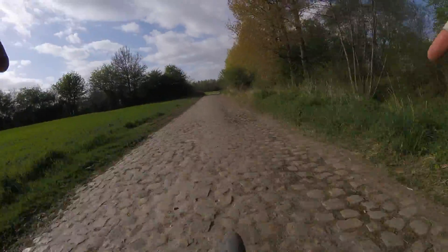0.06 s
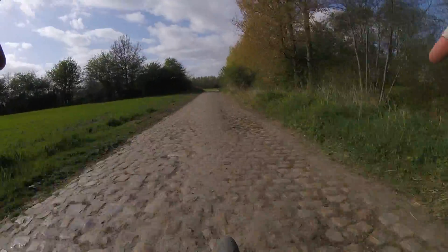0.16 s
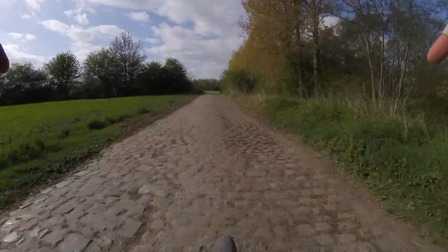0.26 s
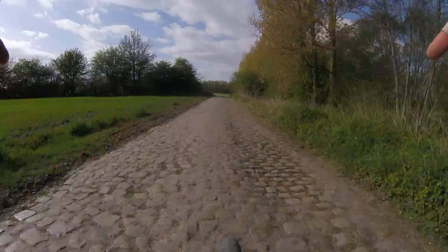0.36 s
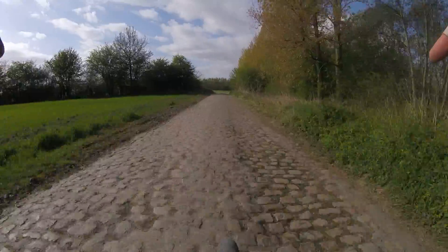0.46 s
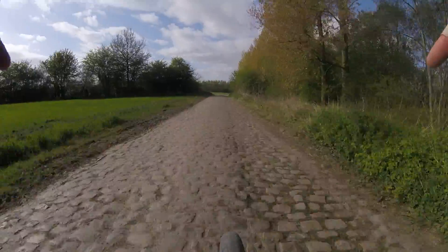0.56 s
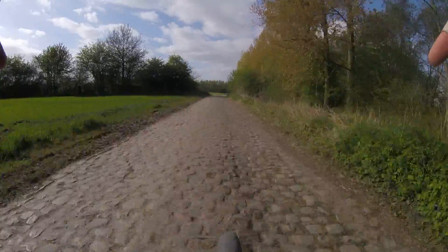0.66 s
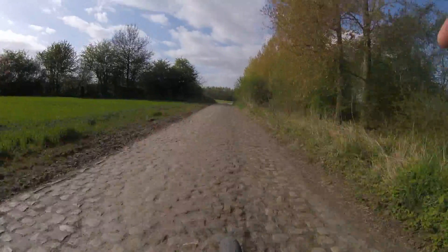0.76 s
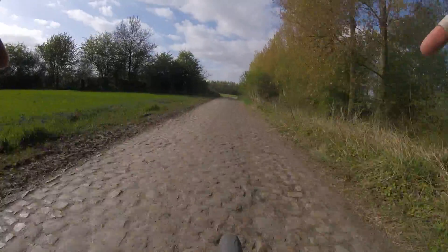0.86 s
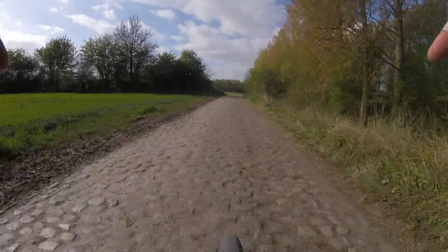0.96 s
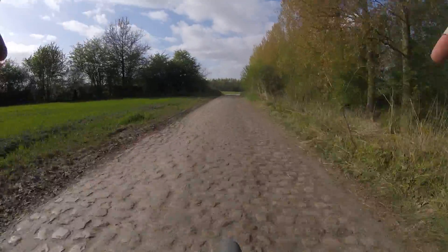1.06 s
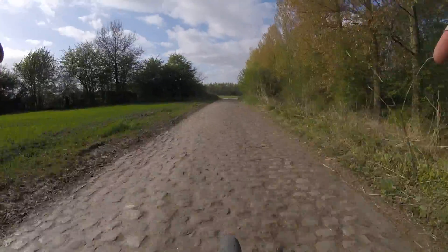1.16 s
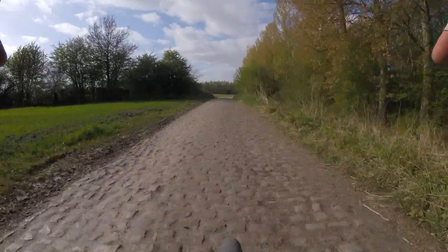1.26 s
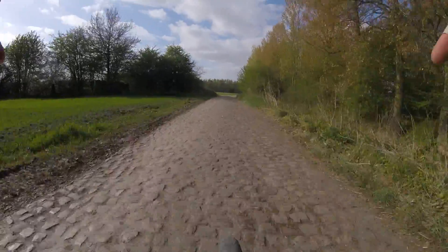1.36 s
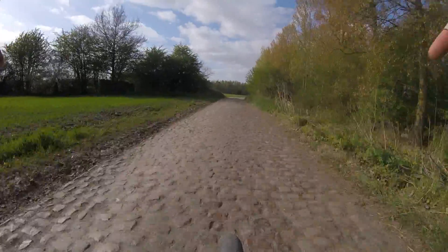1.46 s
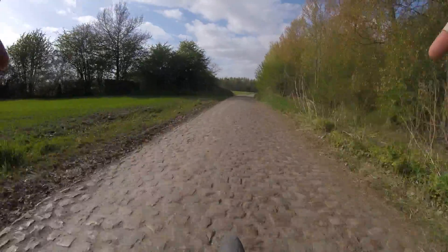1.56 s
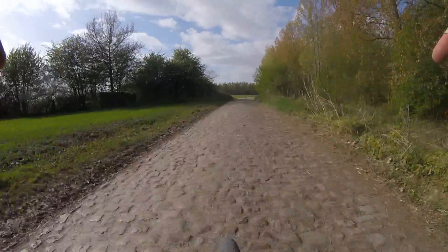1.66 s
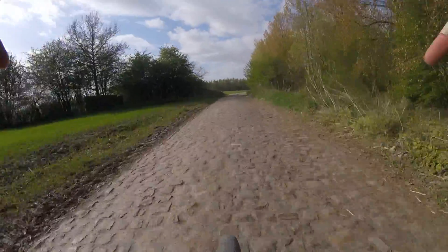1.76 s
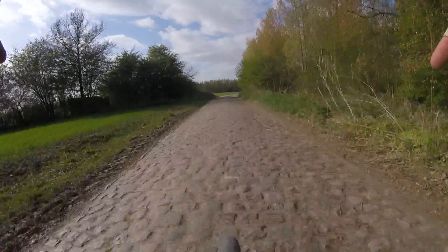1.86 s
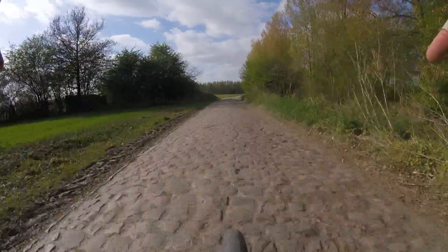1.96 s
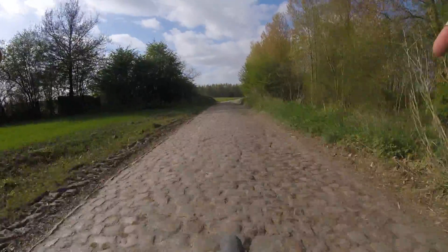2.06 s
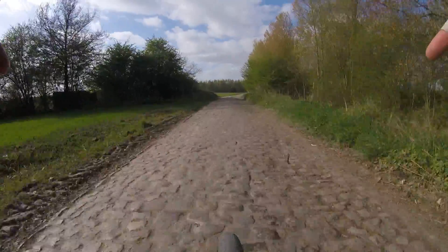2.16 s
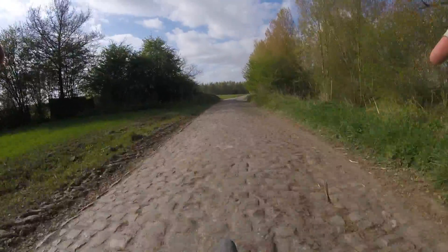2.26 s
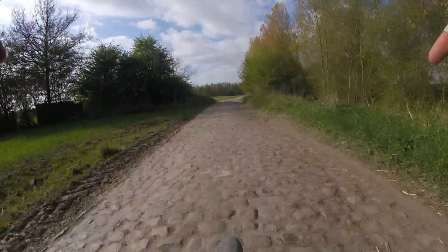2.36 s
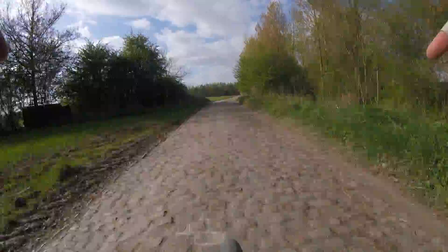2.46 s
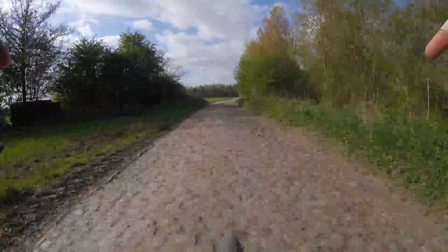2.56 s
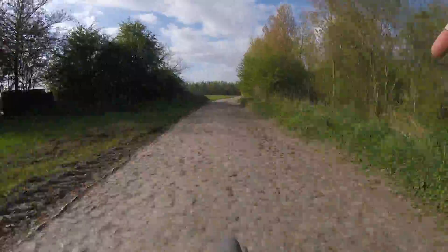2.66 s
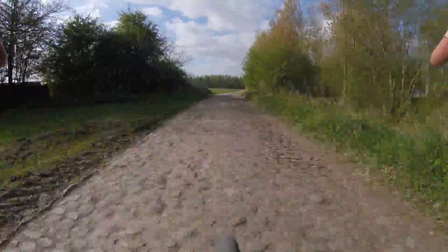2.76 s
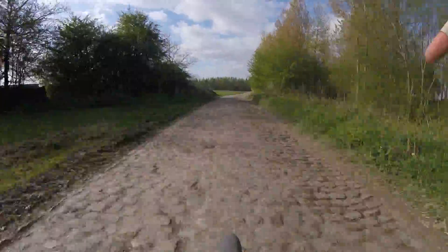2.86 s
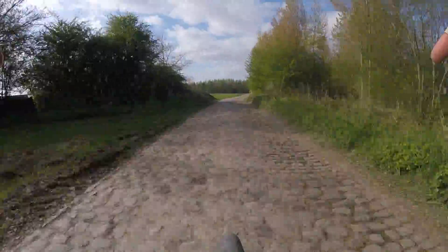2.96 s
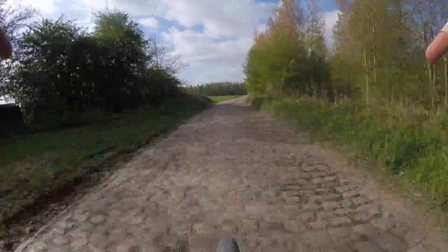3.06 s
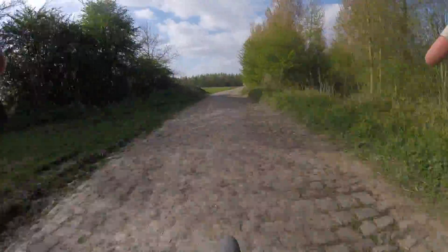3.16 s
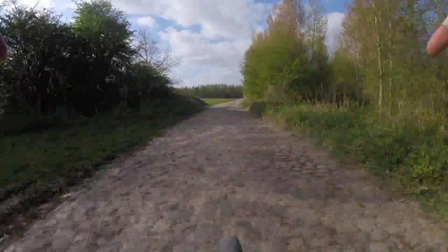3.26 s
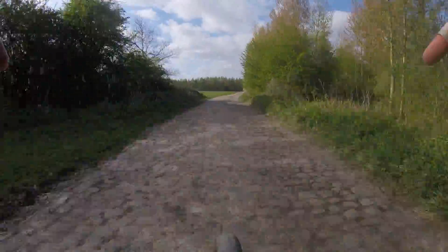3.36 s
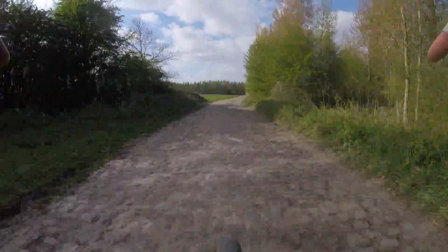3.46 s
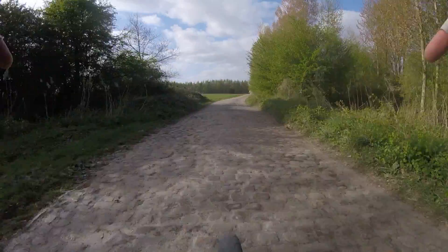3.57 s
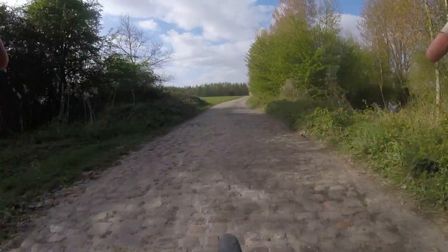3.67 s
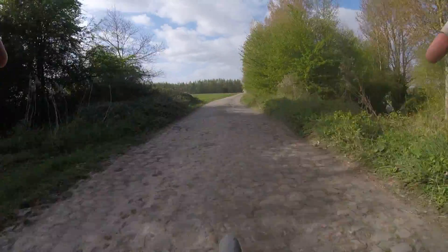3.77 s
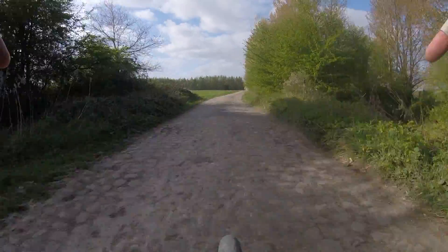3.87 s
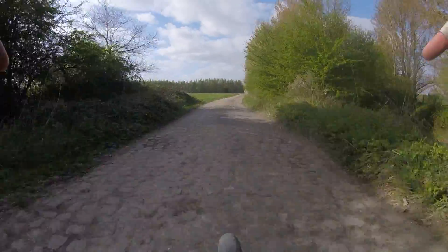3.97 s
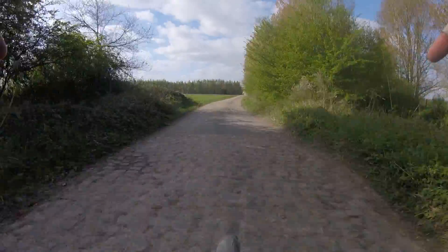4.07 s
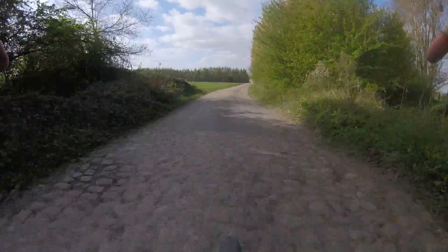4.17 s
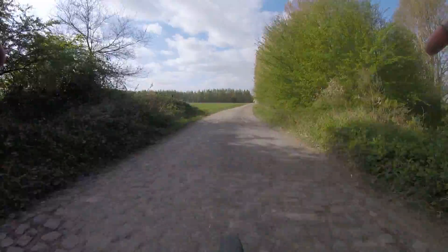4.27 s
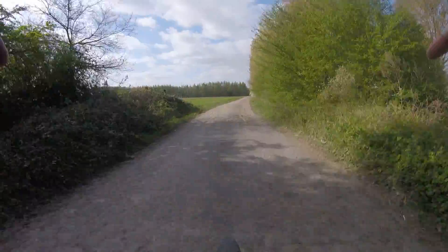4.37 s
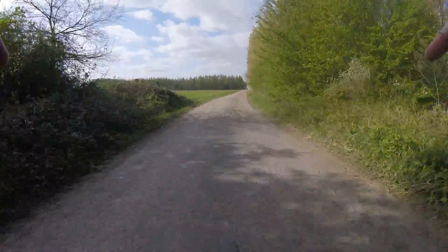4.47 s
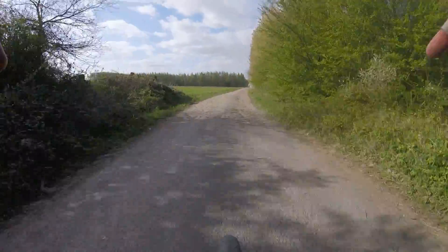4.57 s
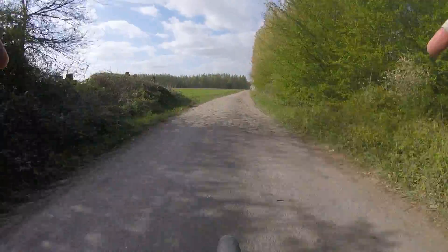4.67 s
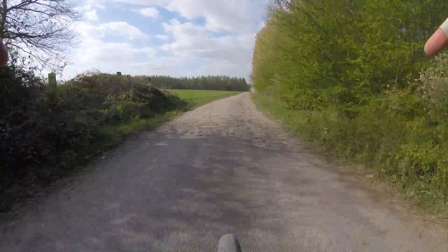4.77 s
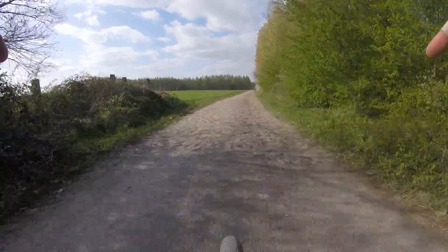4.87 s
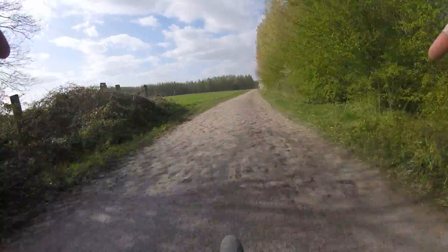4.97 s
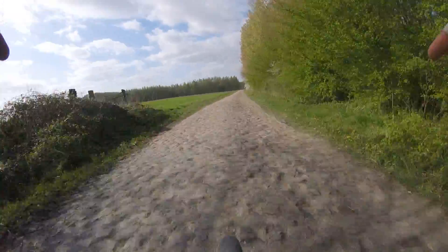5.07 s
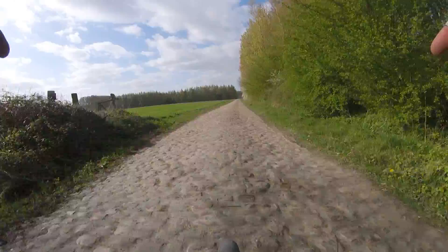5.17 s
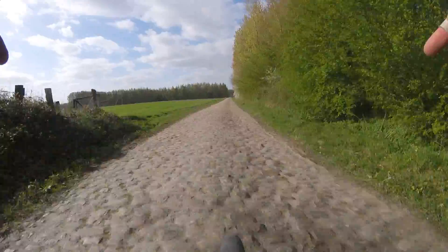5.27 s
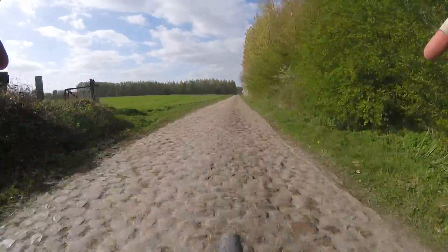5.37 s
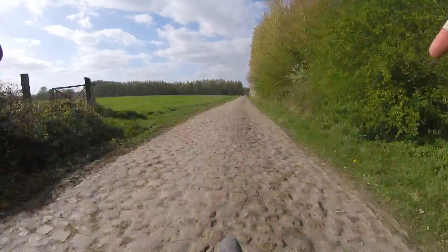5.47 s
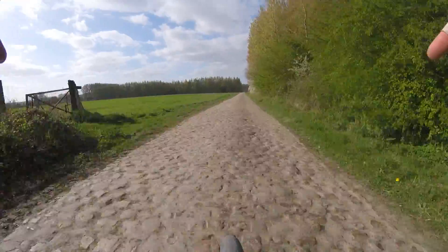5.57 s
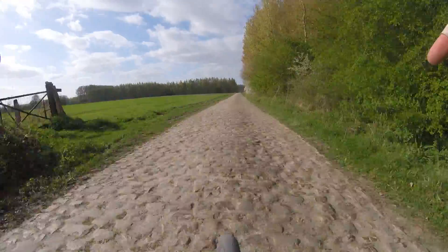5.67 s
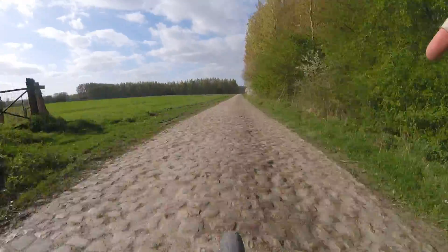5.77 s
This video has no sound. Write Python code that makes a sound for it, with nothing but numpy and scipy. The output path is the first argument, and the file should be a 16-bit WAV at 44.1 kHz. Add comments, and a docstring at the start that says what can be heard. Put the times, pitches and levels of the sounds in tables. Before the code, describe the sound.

A bicycle rides fast over rough cobblestones on a country track, the microphone in a small case clamped to the handlebar. Deep bar thuds swell and fade beneath a drumming frame, irregular mount knocks and bright, clicking rattles. Near the end the hard blows pause for about half a second, leaving gritty tyre hiss, then the heaviest knock lands and the clatter resumes to the end.

```python
"""A bicycle rides over cobblestones; the microphone is in a small case clamped to the handlebar, right at the source.
From the start the bar thuds deep, two bending modes swell and fade, and the frame drums, all as shaped noise.
Short pushes knock on the ringing mount and brief swells of contacts rattle brightly on the case.
After 4.7 s the hard blows stop for about half a second while the thudding sinks and gritty tyre hiss swells;
then rattles return, and the strongest knock lands at 5.3 s, with more knocks and rattles up to the end."""
import sys
import numpy as np
from scipy import signal
from scipy.fft import next_fast_len
from scipy.io import wavfile

SR = 44100
rng = np.random.default_rng(int(sys.argv[2]) if len(sys.argv) > 2 else 0)


def transcribe(signal):
    """Save signal, clipped to [-1, 1], as a 16-bit WAV file at the path in sys.argv[1]."""
    frames = np.atleast_2d(signal).T
    limited = np.clip(frames, -1, 1)
    pcm = np.round(limited * 32767).astype(np.int16)
    wavfile.write(sys.argv[1], SR, pcm)


N = 256220

# hard rattles on the case: time of greatest height [t/s], peak of the case ring [level/dB]
HARD_RATTLES = [(0.146, -42), (0.2029, -40), (0.2266, -34), (0.257, -50), (0.279, -49), (0.299, -36),
                (0.346, -41), (0.3625, -37), (0.369, -37), (0.5887, -36), (0.613, -31.5), (0.624, -34),
                (0.655, -33), (0.665, -31), (0.709, -31.5), (0.777, -36), (0.781, -34), (0.905, -38),
                (0.932, -26.5), (0.944, -34), (1.051, -36), (1.178, -36), (1.194, -37), (1.236, -42),
                (1.255, -33), (1.266, -29), (1.277, -41), (1.309, -31.5), (1.463, -42.5), (1.5466, -37),
                (1.586, -31.5), (1.704, -45), (1.914, -38), (1.921, -36), (2.091, -34), (2.147, -37),
                (2.2, -35.5), (2.223, -40), (2.247, -35), (2.3177, -40), (2.362, -45), (2.504, -33),
                (2.547, -41.5), (2.5664, -38), (2.5916, -28), (2.602, -35), (2.6334, -34), (2.648, -29),
                (2.699, -29.5), (2.742, -42), (2.778, -40), (2.7956, -37), (2.826, -38), (2.8674, -31),
                (2.962, -41.5), (3.056, -31.5), (3.089, -41), (3.103, -27), (3.148, -29), (3.203, -42),
                (3.2181, -41), (3.4708, -40), (3.536, -41), (3.596, -34.5), (3.621, -38), (3.628, -30),
                (3.642, -43), (3.798, -33), (4.009, -44), (4.035, -39.5), (4.1261, -36.5), (4.1535, -41),
                (4.1875, -38.5), (4.354, -46), (4.3814, -28), (4.397, -29), (4.606, -52), (4.614, -42),
                (4.6223, -32.5), (5.237, -48.5), (5.256, -44), (5.292, -40), (5.3778, -35.5), (5.397, -39),
                (5.415, -34.5), (5.488, -37), (5.508, -42), (5.5216, -29.5), (5.533, -33), (5.5756, -35.5),
                (5.672, -44), (5.713, -33)]


def bar(thud_db, lower_db, upper_db):
    """Deep thudding from the tyre as low noise, and the two bending modes of bar and mount as ringing noise."""
    # bending modes, lower then upper: centre [f/Hz], width of one resonance pass [width/Hz]
    bending_modes = [(71.5, 3.0), (98, 3.5)]
    # one second of lead-in lets the filters settle
    thud_noise, *mode_noises = rng.standard_normal((3, N + SR))
    low_noise = band(thud_noise, (21.7, 66.7), order=3)[SR:]
    thudding = from_db(thud_db) * evened(low_noise, share=0.96)
    bending = np.zeros(N)
    for noise, (hz, width_hz), db in zip(mode_noises, bending_modes, (lower_db, upper_db)):
        mode = resonate(resonate(noise, hz, width_hz), hz, width_hz)[SR:]
        bending += from_db(db) * evened(mode, share=0.93)
    return thudding, bending


def frame(drum_db, mount_db, edges):
    """The frame drums evenly; stone edges jolt the mount, whose soft contacts carry little treble."""
    # frame resonances: centre [f/Hz], width [width/Hz], relative level [level/dB]
    frame_modes = [(106.9, 19.9, -7), (158.6, 47.6, -5.5), (206.3, 25.8, 1.5), (232.05, 25.35, -2),
                   (262.6, 25.1, -8.5)]
    # mount resonances: centre [f/Hz], width [width/Hz], relative level [level/dB]
    mount_modes = [(324, 42, -6), (479.2, 49.7, -1), (616, 70.6, -6.5), (816, 133, -16), (1100, 232, -21),
                   (1360, 590, -29.5)]
    # hard knocks: time of greatest height [t/s], peak of the mount ring before the low-pass [level/dB]
    hard_knocks = [(0.179, -23.5), (0.2029, -17), (0.2366, -17.5), (0.4139, -21.5), (0.4378, -18.5),
                   (0.6038, -20.5), (0.627, -19), (0.7095, -14.5), (0.7762, -22.5), (0.892, -27),
                   (0.933, -19), (0.9434, -18), (1.0619, -20), (1.1385, -19), (1.3095, -20), (1.329, -16.5),
                   (1.461, -14), (1.484, -20.5), (1.524, -26), (1.5921, -20), (1.6243, -17),
                   (1.6523, -21.5), (1.75, -20.5), (1.776, -19.5), (1.9714, -18), (2.1225, -18),
                   (2.3724, -22), (2.47, -19.5), (2.6329, -21), (2.7236, -25), (2.8457, -19),
                   (2.861, -15.5), (3.0959, -19), (3.1478, -16), (3.2974, -20), (3.3128, -18.5),
                   (3.503, -21.5), (3.596, -16), (3.8139, -18.5), (4.1468, -17), (4.1778, -22.5),
                   (4.3814, -23), (4.397, -17.5), (4.4383, -16.5), (4.6154, -15), (4.6235, -20),
                   (4.629, -19.5), (5.3204, -12.5), (5.4049, -16.5), (5.4151, -13), (5.5221, -22.5),
                   (5.6172, -19.5), (5.669, -22.5)]

    drum_noise = rng.standard_normal(N) * (from_db(10.0) + edges)
    drumming = rms_one(body(drum_noise, frame_modes))
    # runs of worse stones make the knocking come in lumps
    lumps = bursts(per_s=13, spread_db=1.5, length_s=0.085)
    jolts = rng.standard_normal(N) * (from_db(4.5) + edges) * (from_db(11.0) + lumps)
    knocking = rms_one(body(jolts, mount_modes))

    # a knock is one short push of 0.5 ms, either way
    pushes = rng.choice([-1, 1], (len(hard_knocks), 1)) * np.hanning(int(0.00051 * SR))
    mount_knocks = struck(hard_knocks, pushes, mount_modes, spread_db=0.0)
    # each knock also rings the frame, 2.5 dB under the mount
    frame_knocks = from_db(-2.5) * struck(hard_knocks, pushes, frame_modes, spread_db=1.0)
    shaken = from_db(drum_db) * drumming + from_db(mount_db) * knocking + mount_knocks + frame_knocks
    return low_pass(shaken, 2200.0, order=2)


def rattle(chatter_db, edges, beat):
    """Loose parts tick against the case in clusters; a hard rattle is a brief swell of tiny contacts."""
    # resonances of the microphone's case: centre [f/Hz], width [width/Hz], relative level [level/dB]
    case_modes = [(1820, 900, -9), (2620, 760, -10), (3350, 980, -7), (4515, 530, 0), (5340, 800, -1.5),
                  (6540, 210, 1.5), (7200, 1100, -10)]
    # dull resonances of the clamp: centre [f/Hz], width [width/Hz], relative level [level/dB]
    clamp_modes = [(1440, 800, -0.5), (2920, 1400, -1)]

    ticks = beat * bursts(per_s=300, spread_db=3.0, length_s=0.003) + from_db(-6.0) * edges
    ticking = rng.standard_normal(N) * (from_db(-6.5) + ticks)
    chatter = from_db(chatter_db) * rms_one(body(ticking, case_modes))
    faint_hiss = from_db(-74.5) * rms_one(body(rng.standard_normal(N), case_modes))

    swell = np.hanning(int(0.0042 * SR)) ** 2
    contacts = rng.standard_normal((len(HARD_RATTLES), len(swell))) * swell
    # heavier parts land softer, so the top of their ring is duller
    contacts = low_pass(contacts, 6700, order=2)
    hard = struck(HARD_RATTLES, contacts, case_modes, spread_db=3.0)
    # the clamp clacks 13 dB under every hard rattle
    clacks = from_db(-13) * struck(HARD_RATTLES, contacts, clamp_modes, spread_db=3.0)
    return chatter + faint_hiss + clacks + hard


def tyre(hiss_db, edges):
    """Gritty hiss of rubber on stone: band-limited noise roughened by the stone edges."""
    grit = rng.standard_normal(N) * (from_db(3.5) + edges)
    return from_db(hiss_db) * rms_one(band(grit, (870, 3230), order=4))


def struck(blows, forces, modes, spread_db):
    """Forces strike modes with strengths spread at random; each ring peaks at its given time and level."""
    out = np.zeros(N)
    strengths_db = rng.normal(0, spread_db, (len(blows), len(modes)))
    for (s, db), force, strength_db in zip(blows, forces, strengths_db):
        # only the level column of the modes is changed
        varied_modes = np.array(modes) + np.outer(strength_db, [0, 0, 1])
        ring = body(np.pad(force, (0, SR // 15)), varied_modes)
        height = np.abs(ring).max()
        at = round(s * SR) - np.abs(ring).argmax()
        out[at:at + len(ring)] += (from_db(db) * ring / height)[:N - at]
    return out


def bursts(per_s, spread_db, length_s):
    """Envelope of random jolts: uneven sizes, each a smooth hump; rms 1."""
    present = rng.random(N) < per_s / SR
    sizes = from_db(spread_db * np.minimum(rng.exponential(1, N), 3.5)) * present
    hump = np.hanning(int(length_s * SR))
    return rms_one(signal.fftconvolve(sizes, hump, "same").clip(0))


def body(x, modes):
    """Parallel resonances with alternating signs."""
    out = 0
    for k, (hz, width_hz, db) in enumerate(modes):
        out = out + (-1) ** k * from_db(db) * resonate(x, hz, width_hz)
    return out


def resonate(x, hz, width_hz):
    """Two-pole resonance with a peak gain of about 1."""
    r = np.exp(-np.pi * width_hz / SR)
    numerator = np.array([1, 0, -1]) * (1 - r * r) / 2
    denominator = [1, -2 * r * np.cos(2 * np.pi * hz / SR), r * r]
    return signal.lfilter(numerator, denominator, x)


def evened(x, share):
    """Divides out a share of the signal's own swell, as in a mode driven steadily; rms 1."""
    swell = np.abs(signal.hilbert(rms_one(x), next_fast_len(N))[:N])
    return rms_one(x / (swell + 0.017) ** share)


def band(x, edges_hz, order):
    """Butterworth band-pass."""
    return signal.sosfilt(signal.butter(order, edges_hz, "band", fs=SR, output="sos"), x)


def low_pass(x, cut_hz, order):
    """Butterworth low-pass."""
    return signal.sosfilt(signal.butter(order, cut_hz, fs=SR, output="sos"), x)


def from_db(db):
    """Gain of a level in dB."""
    return 10 ** (np.asarray(db) / 20)


def rms_one(x):
    """Scaled to rms 1."""
    return x / np.sqrt(np.mean(x ** 2) + 1e-20)


def in_time(rows):
    """Columns of a curve table, interpolated to one value per sample."""
    s, *columns = np.transpose(rows)
    return [np.interp(np.arange(N) / SR, s, column) for column in columns]


def with_swells(base_db, swells):
    """Level in dB of a base with smooth swells (s at height, dB, length s) added in power."""
    t = np.arange(N) / SR
    power = from_db(base_db) ** 2
    for s, db, length_s in swells:
        start, end = np.searchsorted(t, [s - length_s / 2, s + length_s / 2])
        hump = np.cos(np.pi * (t[start:end] - s) / length_s) ** 2
        power[start:end] += (from_db(db) * hump) ** 2
    return 10 * np.log10(power)


def scene():
    """Rough paving sets the chatter; the same stone edges drive frame, mount, tyre hiss and ticking parts."""
    # roughness of the paving, as the base chatter of loose parts: [t/s], [level/dB]
    paving = [(0, -49), (.06, -61.5), (.42, -60), (.55, -65), (.62, -63.5), (1.4, -61.5), (1.9, -62),
              (2.04, -67.5), (2.1, -59), (2.45, -63), (2.75, -63), (3.0, -62), (3.27, -60.5), (3.34, -65.5),
              (3.8, -60.5), (3.9, -69), (4.48, -59.5), (4.57, -66), (4.8, -71), (5.13, -73.5), (5.4, -57),
              (5.58, -56.5), (5.63, -76.5), (5.72, -57.5), (5.8, -64.5)]
    # rolling: [t/s], deep thudding [level/dB], frame drumming [level/dB],
    # mount knocking at the reference chatter [level/dB]
    rolling = [(0, -18, -21, -31), (.07, -22.5, -25, -34.5), (.74, -19, -23.5, -33.5),
               (1.5, -22.5, -23, -33), (2.08, -24.5, -26, -32.5), (2.2, -20.5, -20.5, -33.5),
               (2.42, -29, -30, -33), (2.5, -18.5, -20, -33), (2.7, -20, -25.5, -31.5),
               (3.3, -22.5, -25.5, -33.5), (3.77, -19, -25.5, -32.5), (4.15, -27, -25.5, -32),
               (4.38, -17, -21.5, -33), (4.5, -23, -23.5, -31), (4.58, -25, -30, -43),
               (4.63, -24.5, -27, -31.5), (4.97, -35, -27, -30), (5.15, -26.5, -23.5, -25),
               (5.29, -16.5, -18.5, -31.5), (5.52, -17, -22.5, -32.5), (5.8, -21, -19.5, -29)]
    # swing of the bar between its bending modes: [t/s], lower mode [level/dB], upper mode [level/dB]
    swing = [(0.0, -26, -23.5), (0.1, -18.5, -27), (0.63, -21.5, -23), (0.71, -19, -14.5),
             (0.79, -22, -37.5), (0.86, -22.5, -18), (1.0, -35, -26.5), (1.06, -21, -28.5),
             (1.15, -20, -19.5), (1.52, -28, -19.5), (1.7, -15, -16.5), (1.87, -15, -30.5),
             (1.94, -17.5, -21.5), (2.16, -15, -27.5), (2.21, -23, -29), (2.31, -18, -17.5),
             (2.42, -11.5, -37.5), (2.58, -30, -16.5), (2.87, -27, -19.5), (2.92, -12.5, -32),
             (3.04, -35.5, -20), (3.09, -20.5, -13), (3.29, -15.5, -23), (3.36, -22, -24),
             (3.51, -27.5, -22.5), (3.58, -19.5, -19), (3.76, -14, -31), (3.81, -23.5, -17.5),
             (3.91, -39.5, -30), (4.15, -17, -17), (4.26, -15, -20.5), (4.36, -38.5, -19), (4.44, -9, -21),
             (4.75, -28, -26), (4.83, -20.5, -36.5), (4.91, -37.5, -28.5), (5.02, -26.5, -40.5),
             (5.23, -25.5, -32.5), (5.27, -17.5, -23), (5.33, -20, -33), (5.51, -31, -14.5),
             (5.8, -13, -22.5)]
    # swells of gritty hiss under the tyre: time of greatest height [t/s], [level/dB], [length/s]
    scuffs = [(4.449, -47, 0.11), (4.84, -61, 0.15), (5.08, -60.5, 0.29)]

    (paving_db,) = in_time(paving)
    thud_db, drum_db, knocking_db = in_time(rolling)
    # loose parts chatter more around each hard rattle: 24.5 dB under its peak, for 0.06 s
    unrest = [(s, db - 24.5, 0.06) for s, db in HARD_RATTLES]
    chatter_db = with_swells(paving_db, unrest)

    # knocking and hiss follow a share of the chatter's swing about a reference of -61 dB
    chatter_swing_db = chatter_db + 61
    mount_db = knocking_db + 0.38 * chatter_swing_db
    hiss_db = with_swells(-61 + 0.7 * chatter_swing_db, scuffs)
    # the more the loose parts chatter, the harder the edges hit
    roughness = np.clip((chatter_db + 81.0) / 26.0, 0, 1)

    # loose parts meet the mount at one end of the bar's swing
    thudding, bending = bar(thud_db, *in_time(swing))
    in_step = 0.35   # share of the small contacts that keep time with the swing
    beat = 1 - in_step + in_step * 2 * evened(bending, share=1).clip(0) ** 2
    edges = roughness * beat * bursts(per_s=130, spread_db=1.6, length_s=0.006)

    shaking = thudding + bending + frame(drum_db, mount_db, edges)
    return (shaking + rattle(chatter_db, edges, beat) + tyre(hiss_db, edges))[None]


def record(dry):
    """At the microphone, peaks are rounded, the closed case dulls the treble, and the top is cut."""
    top = 0.93   # amplitude limit of the rounding
    rounded = top * np.tanh(dry / top)
    dull = low_pass(rounded, 9100, order=4)
    # 60 dB down from 12.5 kHz upwards
    return signal.sosfilt(signal.cheby2(10, 60, 12500, fs=SR, output="sos"), dull)


dry = scene()
out = record(dry)
transcribe(out)
```